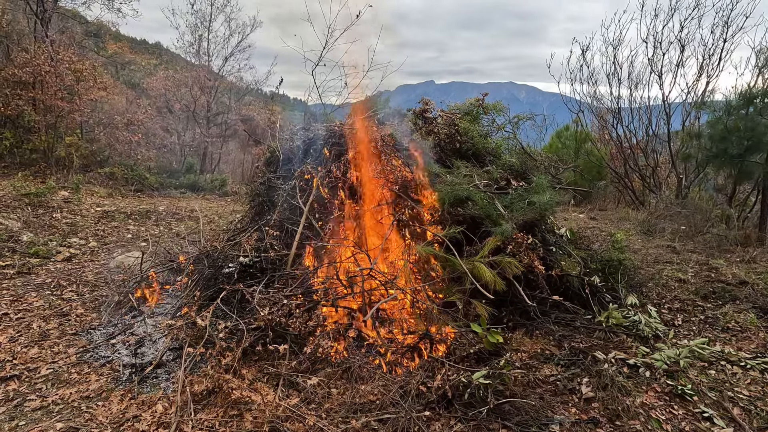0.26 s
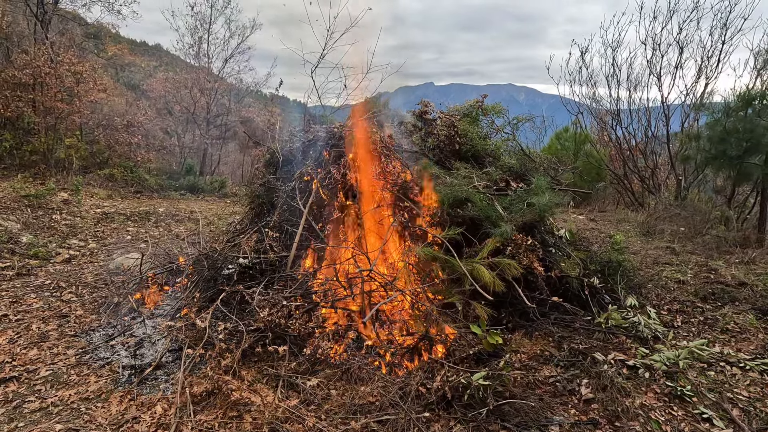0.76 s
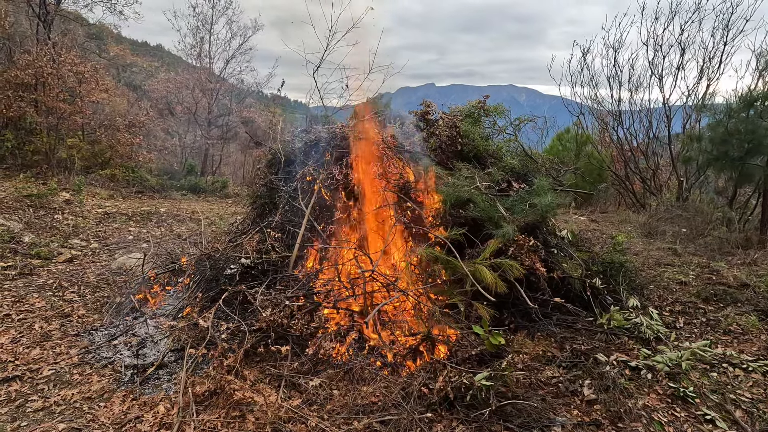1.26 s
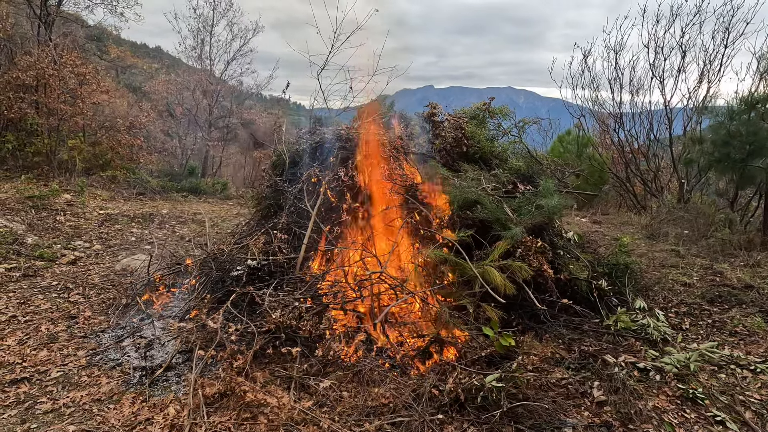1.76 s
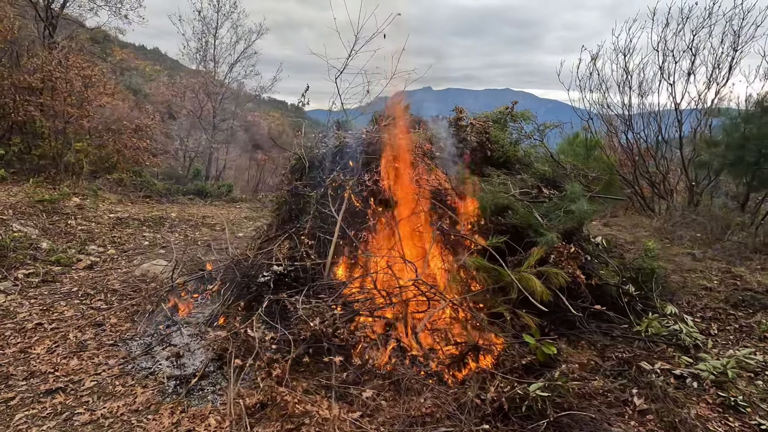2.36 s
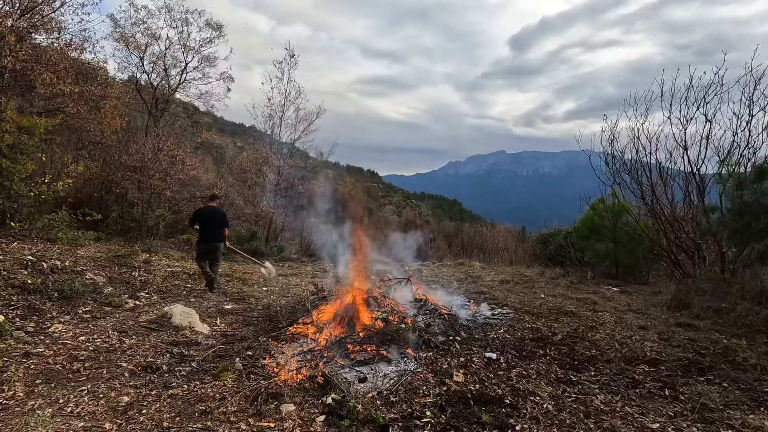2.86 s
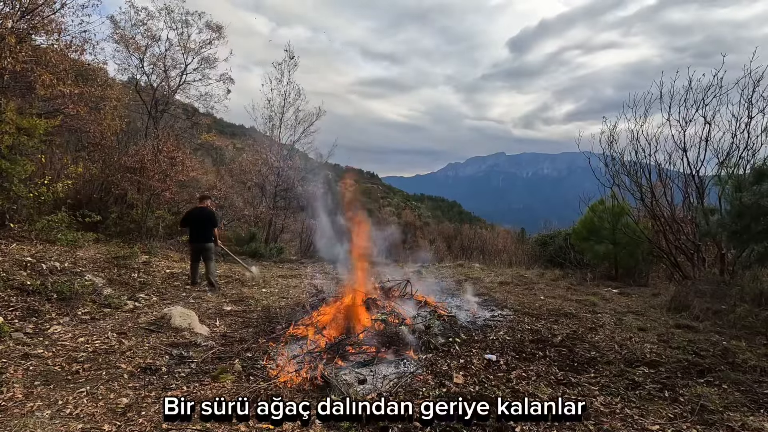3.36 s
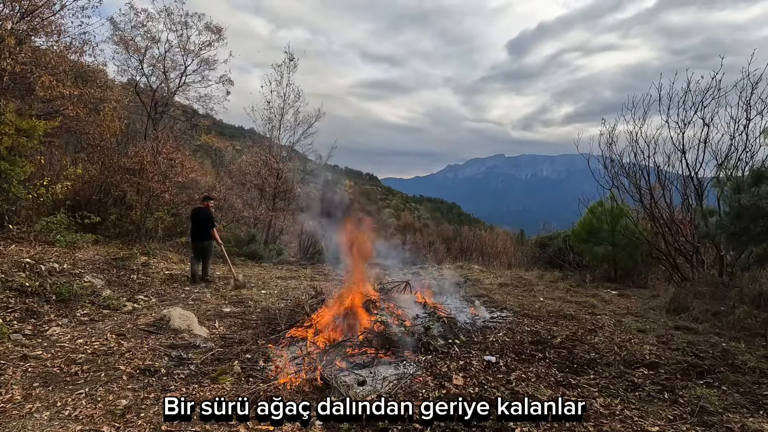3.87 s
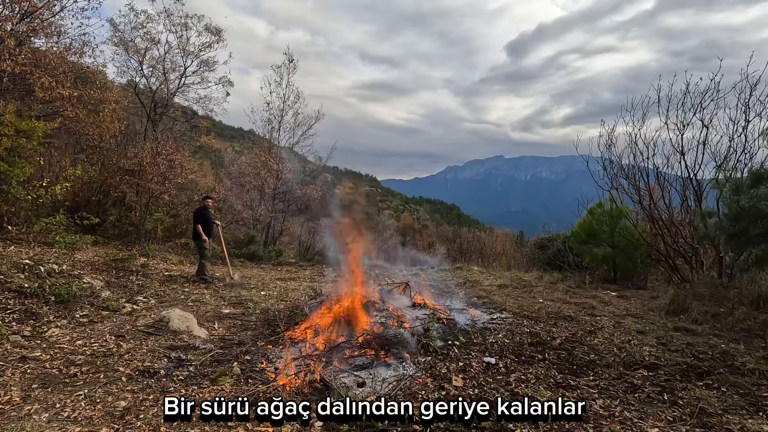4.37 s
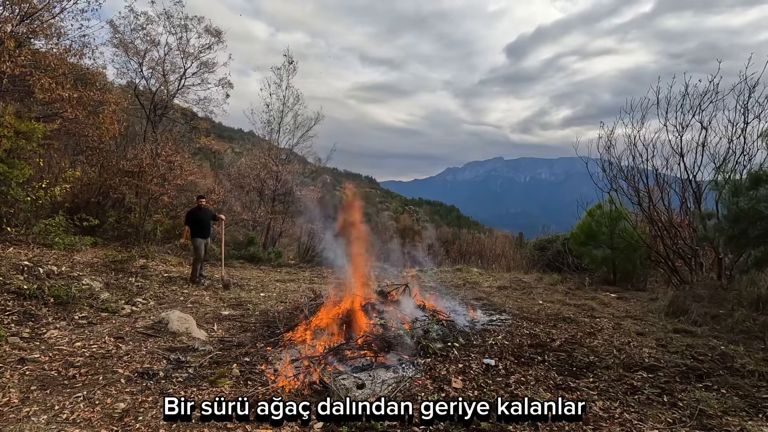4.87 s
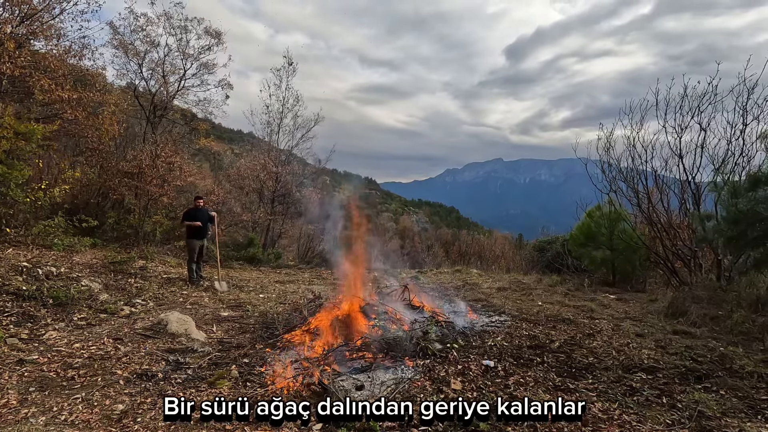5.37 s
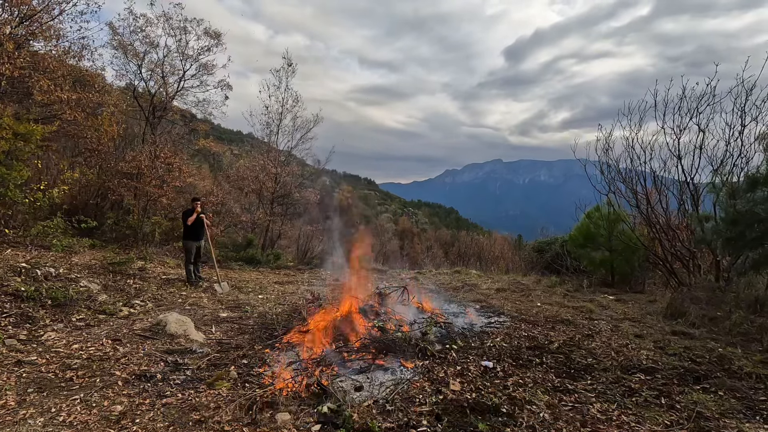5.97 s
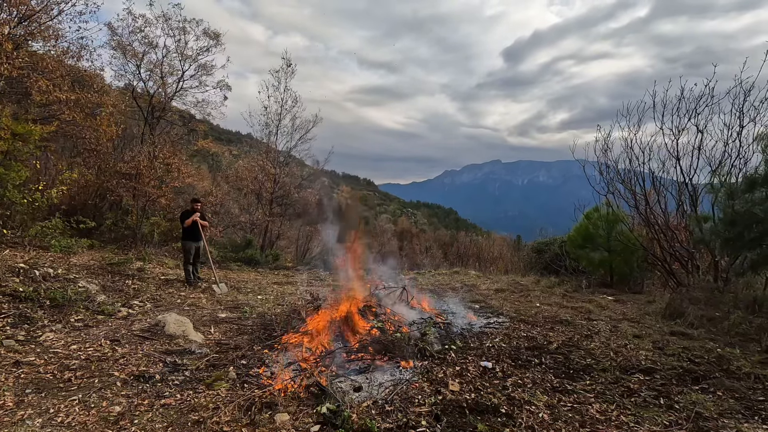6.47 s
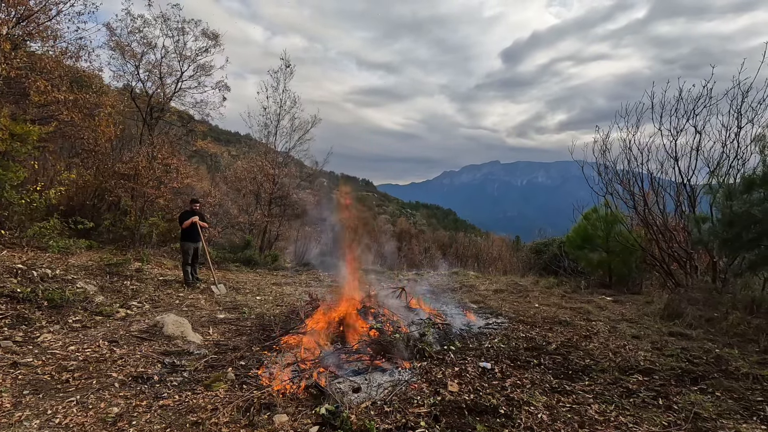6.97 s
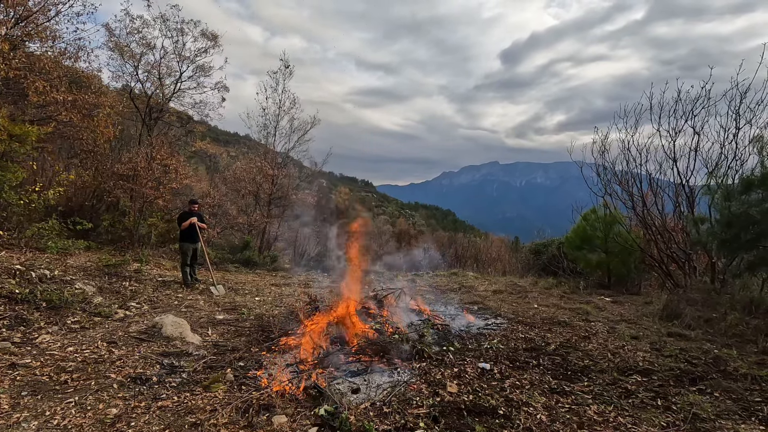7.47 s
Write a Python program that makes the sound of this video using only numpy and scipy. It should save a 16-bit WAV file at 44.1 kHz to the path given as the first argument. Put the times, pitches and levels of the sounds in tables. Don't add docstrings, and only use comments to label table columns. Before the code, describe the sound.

Dense loud crackling and snapping of burning branches over rushing hiss, cut at about 2.5 seconds to a softer, distant, dying fire.

```python
import sys
import numpy as np
from scipy import signal
from scipy.fft import rfft, irfft, next_fast_len
from scipy.io import wavfile
from scipy.ndimage import uniform_filter1d

SR = 44100
rng = np.random.default_rng(int(sys.argv[2]) if len(sys.argv) > 2 else 0)


def wav_record(signal):
    frames = np.transpose(np.atleast_2d(signal))
    bounded = np.clip(frames, -1, 1)
    quanta = np.round(bounded * 32767).astype(np.int16)
    wavfile.write(sys.argv[1], SR, quanta)


def volts_from_db(level):
    exponent = np.asarray(level, float) / 20
    return 10 ** exponent


N = 340893

CUT_S = 2.58
PORTS_OPEN_S = 3.3
T = np.arange(N) / SR
NEAR = T < CUT_S
PORTS_APART = NEAR | (T > PORTS_OPEN_S)
BURST = 4096

# frequency_hz, density_db (per Hz)
HISS_NEAR = [(290, -5), (500, -6), (624, 1), (1250, 1.5), (1840, -2.5), (2660, 3), (4530, 1.5), (5370, 3.5),
             (8370, -1.5), (10200, -9.5), (11300, -11.5), (14700, -50), (22000, -120)]
# frequency_hz, density_db (per Hz)
TOP_LEFT = [(11100, -32), (11400, -12.5), (12300, -2.5), (13400, -15), (14500, -16.5), (15600, -35),
            (16100, -44.5)]
# frequency_hz, density_db (per Hz)
TOP_RIGHT = [(11100, -29.5), (11400, -25.5), (12300, -17.5), (13400, -25.5), (14500, -23.5), (15600, -22),
             (16100, -51)]


def rms_one(x):
    return x / np.sqrt(np.mean(x ** 2) + 1e-20)


def at_hz(points, hz):
    corner_hz, density_db = np.transpose(points)
    return np.interp(np.log(hz + 1), np.log(corner_hz), density_db, left=-120, right=-120)


def drift(rate_hz):
    pole = np.exp(-2 * np.pi * rate_hz * 40 / SR)
    chance = rng.standard_normal(N // 40 + 2002)
    slow = signal.lfilter([1], [1, -2 * pole, pole * pole], chance)[2000:]
    return np.interp(np.arange(N) / 40, np.arange(len(slow)), rms_one(slow))


def patchy_noise(spectrum, shared_db, own_db, rate_hz):
    size = next_fast_len(N)
    hz = np.arange(size // 2 + 1) * SR / size
    coloured = rfft(rng.standard_normal(size)) * volts_from_db(at_hz(spectrum, hz))
    octave = np.log2(hz / spectrum[0][0] + 1e-9)
    out, together = 0, drift(rate_hz)
    for k in range(6):
        share = np.clip(1 - abs(octave - k), 0, 1)
        flicker_db = shared_db * together + own_db * drift(rate_hz * 2)
        out = out + irfft(coloured * share, size)[:N] * volts_from_db(flicker_db)
    return rms_one(out)


def flame_rumble():
    # frequency_hz, density_db (per Hz)
    rumble_near = [(8.8, -8.5), (15, -3), (26, -5), (44, -2), (88, -5.5), (135, -6.5), (240, -14),
                   (380, -20), (520, -20.5), (680, -43), (1140, -120)]
    # frequency_hz, density_db (per Hz)
    rumble_far = [(8.8, -29), (15, -1.5), (40, -0.5), (86, -10.5), (156, -12.5), (250, -18.5), (359, -23),
                  (520, -25), (680, -67), (1140, -120)]
    flare_db = -41 - 3.5 * np.exp(-T / 1)
    gust_db = -39 + 5 * np.exp(-np.maximum(T - 3.03, 0) / 0.68)
    flame_db = np.where(NEAR, flare_db, gust_db)
    flame = np.where(NEAR, patchy_noise(rumble_near, 1.3, 1.2, 4.0), patchy_noise(rumble_far, 1.4, 1.2, 4.0))
    return volts_from_db(flame_db - 1.0) * flame


def vigour():
    # time_s, level_db
    vigour_near = [
        (0.0, -49),
        (.6, -47),
        (1.2, -47.5),
        (2.12, -45.5),
        (2.5, -48),
    ]
    # time_s, level_db
    vigour_far = [(2.9, -50), (3.42, -51), (3.69, -51), (3.91, -55.5), (4.53, -52), (4.75, -55.5),
                  (5.05, -55), (5.5, -55.5), (6.36, -55.5), (6.76, -54.5), (7.1, -54.5), (7.24, -60.5),
                  (7.4, -55.5), (7.73, -51)]
    return np.where(NEAR, *[np.interp(T, *np.transpose(rows)) for rows in (vigour_near, vigour_far)])


def top_opening():
    near_db = -17.5 - 6 * (T > 2.27)
    far_db = np.interp(T, [PORTS_OPEN_S, PORTS_OPEN_S + 0.45], [-28, -18])
    return np.where(NEAR, near_db, far_db)


def sap_hiss(hiss_db, top_db):
    # frequency_hz, density_db (per Hz)
    hiss_far = [(290, 6), (500, -8.5), (562, -3), (1110, -3), (2100, -6), (2800, -5), (4030, -1.5),
                (6880, -10.5), (8050, -5.5), (10400, -12), (11300, -15), (14700, -55.5), (22000, -120)]
    hiss = np.where(NEAR, patchy_noise(HISS_NEAR, 1.8, 1.2, 9.0), patchy_noise(hiss_far, 1.2, 1.0, 10.0))
    left = patchy_noise(TOP_LEFT, 1.9, .8, 9.0)
    right = patchy_noise(TOP_RIGHT, 1.5, .8, 9.0)
    top = np.where(PORTS_APART, [left * volts_from_db(4.0), right * volts_from_db(0.5)], right * volts_from_db(-5.0))
    return volts_from_db(hiss_db - 4.5) * hiss + volts_from_db(hiss_db + top_db) * top


def bursts(rows, halo_db, tail_db, rings=()):
    start_s, length_ms, thud_db, body_db, snap_db, sparkle_db = np.transpose(rows)[:, :, None]
    t = (np.arange(BURST) - BURST // 4) / SR
    hz = np.arange(BURST // 2 + 1) * SR / BURST
    draws = rng.standard_normal((len(rows), 3, BURST))
    decay_s = .00065 * length_ms ** 1.7
    halo = volts_from_db(halo_db) * np.exp(-abs(t) / 0.0059)
    late = halo + volts_from_db(tail_db) * length_ms * np.exp(-abs(t) / 0.02)
    bounce_s = 0.000304 + 0.000863 * rng.random((len(rows), 1))
    ground = 1 + .35 * np.exp(-2j * np.pi * hz * bounce_s)
    colour = volts_from_db(at_hz(HISS_NEAR, hz)) * ground
    main = (t > -.003) & (t < .007)

    def band(k, shape, level_db, rise, early, click=3.6, after=1):
        fade_s = np.where(t < 0, rise * np.minimum(decay_s, .0022), decay_s)
        core = np.exp(-abs(t) / fade_s)
        raw = draws[:, k] * (core + after * late * np.where(t < 0, early * np.exp(t / .012), 1))
        raw[:, BURST // 4] -= click / length_ms[:, 0] ** 0.26
        part = irfft(rfft(raw) * shape, BURST)
        return part * volts_from_db(level_db) / np.sqrt(np.mean(part[:, main] ** 2, axis=1, keepdims=True) + 1e-20)

    def below(edge_hz):
        return 1 / (1 + (hz / edge_hz) ** 7)

    dull = volts_from_db(np.clip(0.62 * (sparkle_db - snap_db + 10.0), -9, 0) * np.log2(hz / 6000 + .01))
    body_shape = colour * (below(4330) - below(1730)) * hz / 3000
    pop = band(0, colour * below(2000), thud_db + .4, rise=.25, early=.3, click=16.0, after=0.9)
    pop = pop + band(0, body_shape, body_db - .3, rise=0.97, early=1.1)
    pop = pop + band(0, colour * (1 - below(5140)) * dull, snap_db + 0.1, rise=0.092, early=1.0)
    if len(rings):
        ring_db = np.zeros((len(rows), len(hz)))
        for when_s, pitch_hz in rings:
            octaves_off = np.log2(hz / pitch_hz + 1e-9)
            resonance_db = -1.5 + 9 * np.exp(-.5 * (octaves_off / 0.15) ** 2)
            ring_db[abs(start_s[:, 0] - when_s).argmin()] = resonance_db
        pop = irfft(rfft(pop) * volts_from_db(ring_db), BURST)
    starts = (start_s[:, 0] * SR).astype(int)
    split = PORTS_APART[starts][:, None]
    right = band(2, volts_from_db(at_hz(TOP_RIGHT, hz)), sparkle_db - 3.6 * split, rise=.3, early=.2, click=3.0, after=0.59)
    left = band(1, volts_from_db(at_hz(TOP_LEFT, hz)), sparkle_db + 5.5, rise=0.29, early=0.202, click=3.0, after=0.59)
    left = np.where(split, left, right)
    out = np.zeros((2, N + 2 * BURST))
    for start, pop_left, pop_right in zip(starts, pop + left, pop + right):
        out[:, start:start + BURST] += pop_left, pop_right
    return out[:, BURST // 4:N + BURST // 4]


def crackle(hiss_db, top_db, count=1000):
    chance, spread = rng.random((count, 3)), rng.standard_normal((count, 4))
    start_s = chance[:, 0] ** 1.5 * (N - 1) / SR
    at = (start_s * SR).astype(int)
    level_db = hiss_db + np.where(NEAR, 2.5, 4.5)
    size_db = level_db[at] + 4.17 * np.minimum(-np.log(chance[:, 1]), 2.2)
    parts_db = size_db[:, None] + np.array([-24.5, -22.0, -22.0, -8.5]) + 2.86 * spread
    parts_db[:, 3] += top_db[at]
    length_ms = 0.65 + 4.0 * chance[:, 2]
    return bursts(np.column_stack([start_s, length_ms, parts_db]), halo_db=-12.5, tail_db=-34.5)


def burst_levels(rows, body_per_sparkle=0.0):
    start_s, length_ms, strength_db, snap_db, sparkle_db = np.transpose(rows)
    bright_db = strength_db - 5 + snap_db / 2
    body_db = strength_db - 0.14 + body_per_sparkle * (sparkle_db + 10)
    return np.column_stack([start_s, np.maximum(length_ms, .5), bright_db - snap_db, body_db,
                            bright_db, bright_db + sparkle_db])


def ticks_and_stages():
    # start_s, peak_db, snap_over_thud_db, sparkle_over_snap_db
    ticks = [(0.0223, -29, 7, -12), (0.0777, -18, 1, -14), (0.1421, -27, 5, -12), (0.628, -20, 12, -12),
             (0.6823, -20, 5, -12), (1.048, -16, 7, -14), (1.3362, -21, 7, -9), (1.367, -25, 7, -12),
             (1.6287, -20, 7, -10), (1.9066, -23, 1, -12), (2.0602, -21, 5, -12), (2.379, -23, 5, -18),
             (2.7546, -39, 5, -12), (2.8893, -29, -3, -12), (3.0545, -28, 0, -12), (3.3772, -29, 5, -16),
             (3.8511, -45, 5, -12), (3.8611, -32, 3, -12), (4.036, -34, 3, -12), (4.2345, -33, 5, -12),
             (4.3226, -33, 5, -13), (4.4925, -29, 11, -14), (4.6877, -32, 10, -10), (4.801, -34, 2, -12),
             (4.9397, -39, 5, -12), (4.9851, -32, 13, -12), (5.3727, -41, 9, -12), (5.694, -45, 5, -12),
             (5.7109, -40.5, 5, -12), (5.8092, -33, 3, -12), (5.984, -33, 7, -12), (6.0536, -46, 5, -12),
             (6.3977, -38, 7, -12), (6.4268, -35, 5, -12), (6.4667, -39, 5, -12), (7.4362, -33, -2, -12),
             (0.7054, -18, 5, -15), (0.7434, -20, 5, -15), (0.753, -24, 5, -15), (0.8046, -9, 3, -15),
              (0.8954, -27, 3, -15), (0.9224, -27, 5, -15), (0.9354, -15, 4.5, -15), (0.9634, -17, 2, -15),
              (1.265, -29, 5, -15), (1.2744, -26, 5, -15), (1.312, -28, 5, -15), (1.4694, -27, 5, -15),
              (2.254, -22, 5.5, -15), (2.4444, -25.5, 5, -15.5), (2.4594, -26, 5, -16),
              (2.9637, -35, 5, -15), (3.5834, -36, 5, -15), (4.0844, -35, 5, -15), (5.8674, -42, 5, -15)]
    # start_s, length_ms, strength_db, snap_over_thud_db, sparkle_over_snap_db
    stages = [(.2803, 0.91, -31, 3, -28), (.2865, 5.6, -38, 12, -14), (.3085, 3.1, -39, 5, -10),
              (.4955, 2.5, -34, 9, -13), (.5085, 1.8, -49, 10, -14), (.5445, 2.5, -42, 25, -1.5),
              (.559, 1.1, -44, 5, -12), (5.0595, 1.6, -42.5, 13, -30), (6.667, 1.1, -56, 3, -15),
              (6.782, 1.1, -55, 5, -15), (7.559, 1.4, -47, 0, -8), (7.576, 2.3, -43.5, 1, -25),
              (7.7125, 4.8, -46, 17, -3), (5.5985, 2.8, -54, 6, -8), (6.6255, 1.2, -49, 8, -14)]
    clicks = [(s + .0014, 1.3, peak_db - 24.5, snap, sparkle) for s, peak_db, snap, sparkle in ticks]
    return bursts(burst_levels([*clicks, *stages]), halo_db=-25, tail_db=-25)


def wood_pops():
    # start_s, length_ms, strength_db, snap_over_thud_db, sparkle_over_snap_db
    pops_near = [(0.0963, 1.9, -34, 10, -9), (0.1061, 1.5, -36, 1, -11), (0.2402, 14, -36, 9, -8.0),
                 (0.2825, 1.5, -31.5, 9, -35), (0.3038, 1.8, -29.5, 4, -15), (0.3535, 0.77, -33, 2, -26),
                 (0.4295, 1.9, -35, 1, -21.5), (0.4912, 1.2, -28.5, -12, -9),
                 (0.5036, 0.94, -30.5, 6, -13.0), (0.5397, 1.2, -37.5, -4, -5), (0.5823, 2.7, -41, 23, -7),
                 (0.7835, 4.2, -33.5, 13.5, -7), (0.8168, 1.9, -26.5, 14, -15.5),
                 (0.8552, 1.7, -34.5, 1, -0.5), (0.9599, 1.2, -31.0, 6, -13), (1.0114, 3.6, -40, 18, -6),
                 (1.4468, 1.5, -32.5, 8.5, -5.5), (1.5434, 1.6, -31.5, -2.5, 0),
                 (1.5917, 4, -30, 3.5, -6.5), (1.7707, 2.5, -27.0, 9.5, -7.5),
                 (2.0794, 2, -37.5, -3.5, -12), (2.2772, 3.1, -32.5, 5.5, -11),
                 (2.3331, 1.15, -25, -1.5, -36), (2.397, 0.92, -33, 11.5, -32.5)]
    # start_s, length_ms, strength_db, snap_over_thud_db, sparkle_over_snap_db
    pops_far = [(2.7304, 1, -46.5, -1, -12), (2.8098, 0.92, -37.5, -8, -20), (2.858, 0.64, -45, -5, -25),
                (3.1101, 2.1, -47, 20.5, -14), (3.207, 1.4, -35, 13, -19), (3.3159, 0.91, -40, -8, -13),
                (3.4362, 0.88, -46, 6, -22.5), (3.488, 0.78, -34, 15.5, -6), (3.574, 1.5, -44.5, 19, -19),
                (3.6218, 0.98, -34, 9, 0.5), (3.7366, 1.2, -36, 8.5, -3.5), (4.169, 0.74, -43, 9, 1),
                (4.3766, 1.7, -47, 8, -1.0), (5.0615, 0.6, -35.5, 11.5, -3.5),
                (5.594, 1.8, -41.5, 8.5, -4.5), (6.5425, 1, -42, 15.5, 0.5), (6.6252, 6.5, -45.5, 14, -12),
                (6.741, 0.89, -41.5, 19, -6), (6.8319, 2, -39.5, 1, -6), (6.8556, 1.5, -44, 4, -5.0),
                (6.985, 1.6, -46, -1, -5), (7.4495, 0.87, -48.5, 18, -7), (7.5732, 0.91, -35, -3.5, -34),
                (7.7074, 1.3, -31, 3.5, 2)]
    # start_s, strength_db, snap_over_thud_db, sparkle_over_snap_db
    twigs_near = [(0.0527, -44.5, 19, -14.0), (0.1944, -41, -10, -21), (0.2152, -38.5, 6.0, -8.0),
                  (0.4434, -40.5, 19, -7), (0.4808, -55, 4.0, -7.0), (0.6918, -39.5, 10, -8),
                  (0.7124, -38.5, -2, -24), (0.7373, -42, 19, -7), (0.9492, -43.5, 3, -14.0),
                  (0.9721, -41.5, 18, -3), (1.0762, -38, 16, -3), (1.1389, -36.5, 12.5, -6),
                  (1.1511, -37, -2, -12), (1.1788, -39, 10, 0), (1.2176, -39, 8.0, -6.0),
                  (1.41, -38.5, 9, -6), (1.4288, -39, -10, 2.0), (1.5092, -46.5, 11.0, -15),
                  (1.5203, -44, -5, -11.0), (1.6715, -40, 14, -0.5), (1.7111, -37, 1.5, -27),
                  (1.7288, -46.5, 28, -5.5), (1.8171, -42.5, -4.5, -7), (1.983, -44.5, 6, -6),
                  (2.0293, -35.5, -6.5, -8), (2.1717, -41, 2, -8), (2.2123, -53, 6, 11),
                  (2.2433, -43.5, 6.5, -4), (2.4762, -40.5, 2.5, -13)]
    # start_s, strength_db, snap_over_thud_db, sparkle_over_snap_db
    twigs_far = [(2.9384, -50.5, 6.0, -24), (2.9973, -52.5, 7, -29), (3.0448, -51, -2, -34.0),
                 (3.089, -45.5, 4, -14), (3.2951, -52, 20, -23), (3.341, -42, 3.0, -11),
                 (3.391, -49.5, 9, -23), (3.7233, -48.5, -3, -24), (3.8078, -51, 8.0, -12.0),
                 (3.8836, -51, 3, -8), (4.2857, -48.5, 12.0, -6), (4.4584, -60, -2, -6.0),
                 (4.5295, -47.5, -10, -15), (4.5781, -52, 3.0, -5), (4.8106, -50.5, -2, -4),
                 (4.8686, -55, -5, -15.0), (4.8959, -53.5, -6, -12.0), (5.0202, -51, -5, -22),
                 (5.0409, -49, 1, -5), (5.2453, -52.5, 14, -18), (5.4513, -50.5, 7.0, -12),
                 (6.0694, -54.5, 8, 1.0), (6.1325, -57, -33, -2), (6.1966, -51.5, 8, -13),
                 (6.7737, -50, 22, -17), (6.9251, -53, 3, -3), (7.0352, -50, 15, -4),
                 (7.0871, -60.5, -21, -12.0), (7.1459, -49, 0, 2.0), (7.357, -51.5, -8, -23.0)]
    # start_s, strength_db
    needle_ticks = [(2.6549, -64.5), (2.705, -60), (3.9131, -72), (3.9506, -58), (4.405, -71),
                    (4.661, -55.5), (4.9646, -56), (5.1218, -54.5), (5.1639, -70), (5.195, -58),
                    (5.2253, -54.5), (5.3005, -57.5), (5.4373, -58), (5.5125, -57), (5.537, -62),
                    (5.6237, -60), (5.7514, -56.5), (5.87, -53.5), (5.942, -56.5), (5.9584, -55.5),
                    (6.0186, -55), (6.306, -59), (6.485, -60), (6.7055, -55), (6.9741, -64.5),
                    (7.1714, -61), (7.3195, -53), (7.397, -62), (7.5133, -54)]
    # start_s, length_ms, strength_db, snap_over_thud_db, sparkle_over_snap_db
    sizzle = (6.662, 12, -54.5, 12, -22)
    # start_s (of the pop), pitch_hz
    wood_rings = [(.0963, 6160), (.2825, 3800), (.3038, 1270), (.3535, 1430), (.4295, 1720), (.4912, 2280),
                  (.5397, 1470), (.8552, 5400), (.9599, 6360), (1.4468, 8700), (2.0794, 5200),
                  (2.3331, 3400), (2.7302, 3700), (2.8098, 6400), (2.858, 1560), (3.4362, 3520),
                  (3.4886, 9100), (4.1693, 6060), (4.3773, 3950), (5.0611, 4230), (5.5947, 6360),
                  (6.6255, 3750), (6.741, 3800), (7.4502, 5830), (7.5731, 4040), (7.7083, 4170)]
    echoes = [(s + .0106, 4.3, strength_db - 14.5, snap - 2, sparkle - 3)
              for s, _, strength_db, snap, sparkle in pops_far]
    twigs = [(s, 1.33, *rest) for s, *rest in twigs_near]
    twigs += [(s, 1.45, *rest) for s, *rest in twigs_far]
    needles = [(s, 1.1, strength_db, 6.5, -3.0) for s, strength_db in needle_ticks]
    rows = [*pops_near, *pops_far, *echoes, *twigs, *needles, sizzle]
    return bursts(burst_levels(rows, body_per_sparkle=-0.16), halo_db=-16.0, tail_db=-19, rings=wood_rings)


def scene():
    # time_s, level_db
    scene_change = [
        (2.511, 10),
        (2.515, -32.5),
        (2.535, -68),
        (2.545, -100),
        (2.605, -69.5),
        (2.615, -32.5),
        (2.635, -17),
        (2.66, -8.5),
        (2.75, 0),
        (2.9, 2),
    ]
    hiss_db, top_db = vigour(), top_opening()
    bed = flame_rumble() + sap_hiss(hiss_db, top_db) + crackle(hiss_db, top_db)
    fade = volts_from_db(np.interp(T, *np.transpose(scene_change)))
    pops = wood_pops() + ticks_and_stages()
    return fade * bed + pops * np.where(NEAR, fade / fade[0], 1)


def side_patches(mid, low_hz, high_hz, near_share, far_share, level_db):
    moments = N // 1024 + 2
    when_s = np.arange(moments) * 1024 / SR
    share = np.where(when_s < CUT_S, near_share, far_share * (when_s > PORTS_OPEN_S))
    on = rng.random(moments) < share
    gate = np.clip(3 * np.interp(T, when_s, on) - 1, 0, 1)
    band_pass = signal.ellip(6, 1, 70, [low_hz, high_hz], "band", fs=SR, output="sos")
    return volts_from_db(level_db) * gate * np.roll(signal.sosfilt(band_pass, mid), 200)


def above(x, sos):
    return x - signal.sosfiltfilt(sos, x)


def band_limit(x):
    return signal.sosfilt(signal.butter(12, 16410, fs=SR, output="sos"), x)


def record(dry):
    mid = dry.mean(axis=0)
    side = side_patches(mid, 4440, 11200, .35, 0.13, -16.0)
    side = side + side_patches(mid, 170, 1400, 0.38, 0.13, -26)
    side = side + side_patches(mid, 1500, 3640, .2, .08, -20.5)
    wide = .75 * np.tanh(dry / .75) + side * [[1], [-1]]
    shut = (T > CUT_S) * np.clip((PORTS_OPEN_S + .1 - T) / 0.5, .4, 1)
    half_shut = (T > CUT_S) * np.clip((PORTS_OPEN_S + .15 - T) / .2, 0, 1)
    wide = wide - half_shut * above(wide, signal.cheby2(10, 30, 15300, fs=SR, output="sos"))
    air = above(wide, signal.cheby2(8, 30, 14300, fs=SR, output="sos"))
    mix = wide - shut * air
    edge = signal.sosfiltfilt(signal.butter(12, 15200, "high", fs=SR, output="sos"), mix)
    dropped = np.repeat(rng.random(N // 2048 + 1) < .3, 2048)[:N] * np.where(NEAR, .7, 1)
    mix = mix - uniform_filter1d(dropped, size=256) * edge
    return band_limit(mix)


dry = scene()
out = record(dry)
wav_record(out)
```